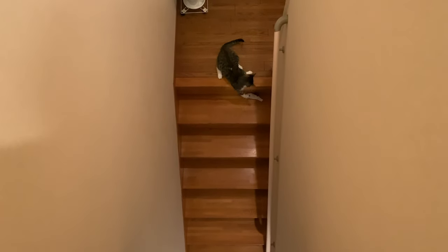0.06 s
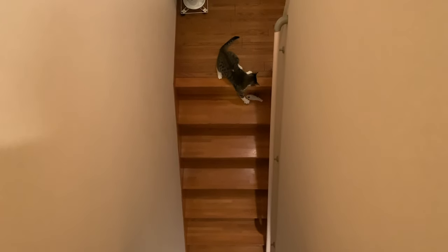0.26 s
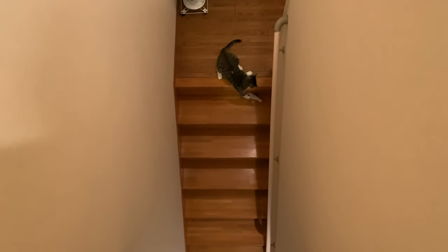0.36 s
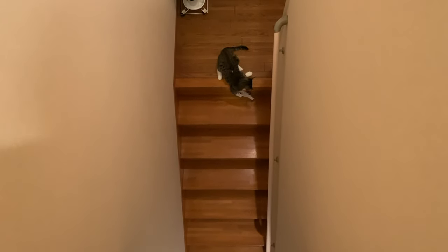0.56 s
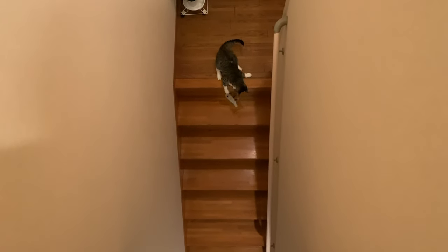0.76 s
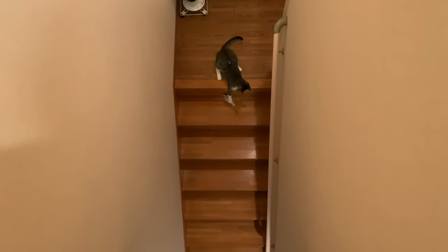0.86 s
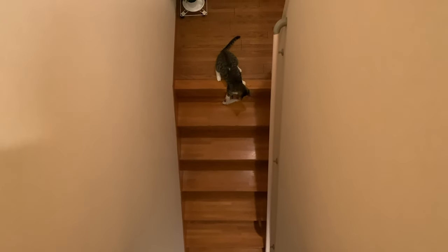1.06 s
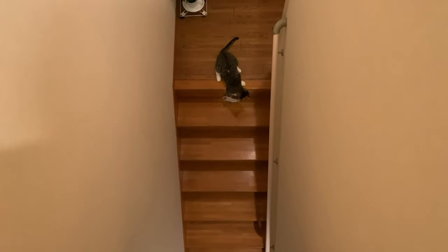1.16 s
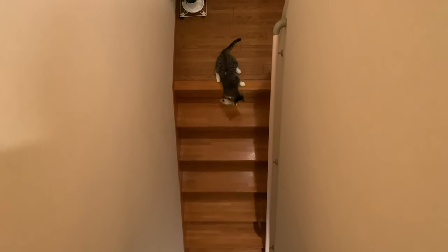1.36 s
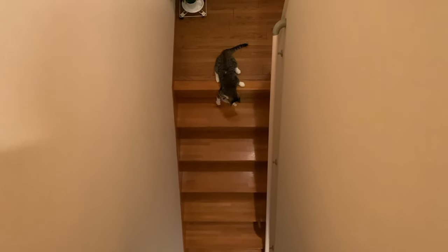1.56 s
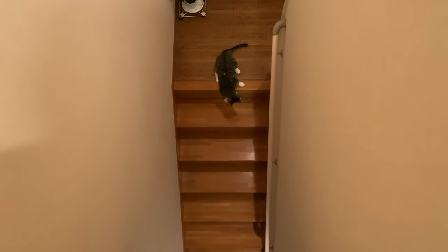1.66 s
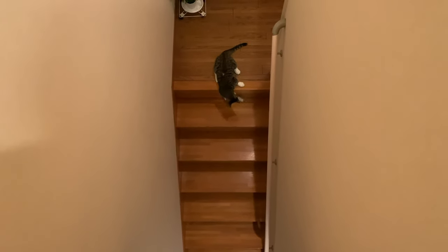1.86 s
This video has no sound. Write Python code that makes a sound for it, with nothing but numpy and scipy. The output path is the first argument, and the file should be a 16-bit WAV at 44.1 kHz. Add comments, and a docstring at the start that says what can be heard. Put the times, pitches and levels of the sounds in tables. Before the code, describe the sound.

Irregular toy knocks on wooden treads, the first by far the loudest, later ones duller with faint thuds; close walls give a short echoing tail, over quiet room noise and low hum, microphone some distance above.

```python
"""At the edge of a wooden staircase, heard from above, a cat bats a small hard toy about.
Each knock is a noise-burst clatter, thickened by close walls, with decaying modes and a stairwell tail.
Faint swells of grainy noise rise around some onsets; ragged rings and falling thuds sound in the treads.
Underneath lie shaped room noise, a faint wavering hum and a band of noise that dies away."""
import sys
import numpy as np
from scipy import signal
from scipy.fft import rfft, irfft
from scipy.io import wavfile
from scipy.ndimage import uniform_filter1d

SR = 44100
rng = np.random.default_rng(int(sys.argv[2]) if len(sys.argv) > 2 else 0)


def digitize_waveform(pressure):
    """Quantize a signal to 16-bit integers and store it at the path in sys.argv[1].

    Rows of a 2-D input are taken as channels; values are limited to [-1, 1].
    """
    field = np.atleast_2d(pressure).T
    bounded = np.clip(field, -1, 1)
    quanta = np.round(bounded * 32767).astype(np.int16)
    wavfile.write(sys.argv[1], SR, quanta)


N = 83790  # scene length [samples]


def amp(db):
    """Level to gain: 20 dB is a factor of ten in amplitude."""
    return 10 ** (np.asarray(db) / 20)


def evened(x):
    """RMS normalisation: scales to mean power 1."""
    return x / np.sqrt(np.mean(x ** 2) + 1e-20)


def unit(x):
    """Energy normalisation: scales to a mean energy of 1 per channel."""
    return evened(x) / np.sqrt(x.shape[-1])


def read(points, hz):
    """Logarithmic frequency scale: interpolates a table along it."""
    f, value = np.transpose(points)
    return np.interp(np.log(hz + 1), np.log(f + 1), value)


def add(mix, s, sound):
    """Superposition: adds a sound to the stereo mix at time s [s]."""
    part = mix[:, round(s * SR):][:, :sound.shape[1]]
    part += sound[:, :part.shape[1]]


def noise_pair(same, size):
    """Partial coherence: mid and side noise give two ports the likeness in the table."""
    a, b = rfft(rng.standard_normal((2, size)))
    likeness = np.clip(read(same, np.fft.rfftfreq(size, 1 / SR)), 0, 1)
    mid = a * np.sqrt((1 + likeness) / 2)
    side = b * np.sqrt((1 - likeness) / 2)
    return irfft([mid + side, mid - side], size)


def colour(x, db):
    """Minimum phase: the Hilbert transform of log gain makes a causal filter from a level per bin."""
    log_gain = np.log(amp(np.concatenate([db, db[-2:0:-1]])))
    response = np.exp(np.conj(signal.hilbert(log_gain)))[:len(db)]
    return irfft(rfft(x) * response)


# bands whose levels depend on how the toy lands: bass, low mids, clack, treble, top
# (low edge [Hz], high edge [Hz])
KNOCK_BANDS = [(220, 500), (500, 1100), (1100, 3000), (4000, 9000), (10500, 14000)]
# broad spectral colour of the knocks, with a narrow dip near 10 kHz
# (frequency [Hz], relative level [dB])
KNOCK_COLOUR = [(60, -25), (150, -13.5), (220, -18), (320, -11), (490, -12), (570, -10), (870, -9.5),
                (1140, -3.5), (1300, -0.5), (1550, 1.5), (2100, -3.5), (2450, -3), (2780, -11),
                (3150, -10.5), (3520, -17.5), (3800, -10.5), (5300, -14), (7000, -20), (9000, -19.5),
                (9900, -38), (10700, -19.5), (13600, -31.5), (15000, -59)]
# ringing modes of toy on wood (frequency [Hz], relative level [dB], t60 [s])
RINGING_MODES = [(319.5, -7, 0.2), (1321, -2, .22), (1522, -10.5, 0.56), (1772, -10, 0.2), (2385, 0, 0.2),
                 (2566, -2, 0.27), (2580, -9.5, 0.33), (3750, -10, 0.24), (5549, -7.5, 0.46),
                 (6380, -6, 0.15), (6880, -0.5, 0.16), (7180, -2, 0.33), (7400, -6, .25)]
RISE_S = 0.0017
CLATTER_FALL = 2.1  # exponent of the decay: above 1, it holds and then drops
CLATTER_GRAIN_DB, DIRECT_SAME = 4, 0.84  # rms unevenness; left-right likeness (0-1)
NEAR_DB, NEAR_S = -1.5, 0.014  # near reflections: energy relative to the clatter, decay constant
RIPPLE_DB, RIPPLE_HZ = 4, 39.63  # fine unevenness of each knock's resonances: size, spacing
KNOCK_GAIN_DB = 65.5


def knock(length, ring_db, band_db):
    """Impact excitation: contacts set off near reflections, damped modes and a diffuse tail."""
    t, hz = np.arange(SR) / SR, np.fft.rfftfreq(SR, 1 / SR)
    rise = 1 - np.exp(-t / RISE_S)

    grain = evened(uniform_filter1d(rng.standard_normal(SR), size=30))
    contacts = amp(CLATTER_GRAIN_DB * grain)
    fall = np.exp(-(t / length) ** CLATTER_FALL)
    clatter = unit(noise_pair([(1, DIRECT_SAME)], SR) * contacts * rise * fall)
    near = amp(NEAR_DB) * unit(noise_pair(TAIL_LIKENESS, SR) * rise * np.exp(-t / NEAR_S))

    ring = np.zeros(SR)
    for f, db, t60 in RINGING_MODES:
        mode = np.sin(2 * np.pi * (f * t + rng.random()))
        ring += amp(db) * unit(rise * amp(-60 * t / t60) * mode)

    ripple_steps = np.clip(rng.standard_normal(SR), -2, 2)
    ripple = RIPPLE_DB * np.interp(hz / RIPPLE_HZ, np.arange(SR), ripple_steps)
    reflected = colour(near + stairwell(), ripple)

    body = read(KNOCK_COLOUR, hz)
    touch = []
    for (low, high), db in zip(KNOCK_BANDS, band_db):
        # bins are 1 Hz apart, so the band edges also index them
        body_power_db = 10 * np.log10(np.sum(amp(body[low:high]) ** 2))
        touch.append((np.sqrt(low * high), db - body_power_db))
    return colour(clatter + amp(ring_db) * ring + reflected, body + read(touch, hz) + KNOCK_GAIN_DB)


# knocks of the toy (time [s], clatter length [s], ringing level [dB],
# then relative level [dB] of: bass, low mids, clack, treble, top)
TOY_KNOCKS = [(0.2188, 0.012, -17, -35.5, -30.5, -21, -14.5, -32),
              (0.435, 0.011, -19.5, -48, -48, -44, -54, -63),
              (0.815, 0.067, -31, -44, -45.5, -46, -51.5, -58),
              (0.918, 0.011, -19.5, -38, -47.5, -52.5, -75, -81),
              (1.028, 0.0071, -25, -43, -51.5, -48, -52.5, -68),
              (1.054, 0.015, -24, -42, -51.5, -43, -47.5, -61),
              (1.0657, 0.0093, -22.5, -42, -46.5, -34.5, -21, -34),
              (1.1305, 0.02, -27, -43, -38, -30.5, -42.5, -52),
              (1.509, .008, -26, -55, -58.5, -60.5, -53.5, -67.5),
              (1.521, 0.021, -24.5, -45.5, -53.5, -47.5, -75, -73),
              (1.6032, 0.015, -31, -41, -32, -32, -38, -58),
              (1.752, 0.03, -20.5, -40.5, -43, -33, -46, -62)]


def knocks():
    """Superposition of impacts: every knock of the toy at its own time."""
    out = np.zeros((2, N))
    for s, length, ring_db, *band_db in TOY_KNOCKS:
        add(out, s, knock(length, ring_db, band_db))
    return out


# faint swells of noise before some knocks
# (time [s], length of swell [s], level at end of swell [dB], treble lift [dB])
NOISE_SWELLS = [(0.196, 0.044, -42.5, -1), (0.744, 0.07, -61, 11.5), (1.59, 0.011, -46.5, -6)]
SWELL_GRAIN_DB = -5  # rms unevenness of the noise


def noise_swells():
    """Amplitude envelope: grainy noise in the knocks' colour rises around the onset, then decays."""
    out = np.zeros((2, N))
    t, hz = np.arange(SR) / SR, np.fft.rfftfreq(SR, 1 / SR)
    for s, length, db, lift_db in NOISE_SWELLS:
        unevenness = evened(uniform_filter1d(rng.standard_normal(SR), size=90))
        grain = evened(amp(SWELL_GRAIN_DB * unevenness))
        tilt = read([(2500, 0.0033), (6000, lift_db)], hz)
        noise = evened(colour(noise_pair(TAIL_LIKENESS, SR) * grain, read(KNOCK_COLOUR, hz) + tilt))
        swell = np.sqrt(t / length) * np.exp(-np.maximum(t - length, 0) / NEAR_S)
        add(out, s, amp(db) * noise * swell)
    return out


THUMP_WIDTH = 0.27  # half-width of the ragged band in natural log of frequency, to 1/e


def ragged(pitch):
    """Narrow-band noise: one second of random vibration around a pitch [Hz]."""
    hz = np.fft.rfftfreq(SR, 1 / SR)
    band = np.exp(-(np.log((hz + 1) / pitch) / THUMP_WIDTH) ** 2)
    return evened(irfft(rfft(rng.standard_normal(SR)) * band))


# rings left in the wood, at a pitch that depends on the spot struck
# (time [s], pitch [Hz], level before rise and decay [dB], t60 [s])
WOOD_RINGS = [(0.222, 325, -18.5, 0.059), (0.222, 613, -21, 0.053), (0.461, 77.3, -40.5, 0.14),
              (0.459, 188, -46, 0.51), (0.974, 368, -47, 0.3), (1.042, 163, -33.5, 0.195),
              (1.072, 1889, -26.5, 0.078), (1.134, 796.6, -40.5, 0.28), (1.285, 196, -50, 0.28),
              (1.526, 338, -51, 0.16), (1.605, 625, -28.5, 0.035), (1.605, 962, -36.5, 0.19),
              (1.613, 410.4, -40, 0.25), (1.796, 187, -44, 0.13)]
THUMP_RISE_S, THUMP_NOISE = 0.0033, 0.49  # rise constant; raggedness added to the sine


def thumps():
    """Damped resonance: a struck tread rings at a slightly ragged pitch."""
    out, t = np.zeros((2, N)), np.arange(SR) / SR
    for s, pitch, db, t60 in WOOD_RINGS:
        ring = np.sin(2 * np.pi * pitch * t) + THUMP_NOISE * ragged(pitch)
        envelope = (1 - np.exp(-t / THUMP_RISE_S)) * amp(db - 60 * t / t60)
        add(out, s, (ring * envelope)[None])
    return out


# short dead thuds of paw and toy
# (time [s], length [s], first pitch [Hz], last pitch [Hz], nominal peak level [dB])
TREAD_THUDS = [(0.2211, 0.0063, 1384, 1336, -13), (0.435, 0.037, 338, 252, -34.5),
               (0.437, 0.062, 200.8, 186.4, -38.5), (0.777, 0.044, 606, 401, -51),
               (0.781, 0.034, 376, 215.7, -47), (0.899, 0.042, 597, 447, -43),
               (0.903, 0.011, 298, 273, -40), (0.923, 0.018, 357.5, 183.8, -37.5),
               (0.935, 0.018, 463, 356.4, -39.5), (1.017, 0.028, 169.3, 155.6, -33),
               (1.128, 0.014, 1556, 1338, -29), (1.533, 0.05, 120.6, 97, -47.5),
               (1.756, 0.0433, 573, 384, -45.5), (1.762, 0.046, 249.8, 151, -38.5)]
THUD_ROUGH = 0.41  # unevenness of the contact
THUD_SKEW = 0.53  # under 1: a thud swells faster than it fades


def thuds():
    """Bending-wave dispersion: a flexing tread's treble arrives first, so each thud falls in pitch."""
    out, t = np.zeros((2, N)), np.arange(SR) / SR
    for s, length, first_hz, last_hz, db in TREAD_THUDS:
        u = t[t < length] / length
        pitch = first_hz * (last_hz / first_hz) ** u
        glide = np.sin(2 * np.pi * np.cumsum(pitch) / SR)
        push = evened(glide + THUD_ROUGH * ragged(pitch.mean())[:len(u)]) / np.sqrt(2)
        add(out, s, (amp(db) * np.sin(np.pi * u ** THUD_SKEW) * push)[None])
    return out


THUMP_ROOM_DB = -7  # gain of the stairwell behind the blows


def treads():
    """Room response by convolution: rings and thuds with the stairwell behind them."""
    blows = thumps() + thuds()
    return blows + amp(THUMP_ROOM_DB) * signal.fftconvolve(blows, stairwell(), axes=1)[:, :N]


# stairwell decay (frequency [Hz], t60 [s])
STAIRWELL_DECAY = [(100, 0.5), (280, 0.91), (600, 0.6257), (1600, 0.5763), (3800, 0.5085), (6500, 0.5),
                   (9000, 0.43), (13000, 0.26)]
# strength of the stairwell tail (frequency [Hz], relative level [dB])
TAIL_LEVEL = [(100, -4), (300, -4.5), (700, 2.5), (1500, -1), (2400, 6), (4000, -1.5), (7000, -5.5),
              (13000, -4)]
# left-right likeness of diffuse sound (frequency [Hz], coherence [0-1])
TAIL_LIKENESS = [(100, 0.93), (300, 0.7), (700, 0.2), (1500, 0.5), (3000, 0.03), (7000, 0.95),
                 (13000, 0.21)]
TAIL_RISE_S = 0.011


def stairwell():
    """Diffuse reverberation: one second of noise decaying by frequency, the top treble soonest."""
    hz, t, z = signal.stft(noise_pair(TAIL_LIKENESS, SR), SR, nperseg=256)
    decay_db = -60 * t / read(STAIRWELL_DECAY, hz)[:, None]
    level_db = read(TAIL_LEVEL, hz)[:, None] + decay_db
    tail = signal.istft(z * amp(level_db), SR, nperseg=256)[1][:, :SR]
    rise = 1 - np.exp(-np.arange(SR) / SR / TAIL_RISE_S)
    return tail * rise / np.sqrt(0.032 * SR)


FADING_HZ, FADING_WIDTH_HZ = 2060, 480  # centre, half-width to 1/e
FADING_DB, FADING_T60 = -60.5, 0.8  # starting level, t60 [s]


def fading_ring():
    """Free decay: a band of sound still hanging in the stairwell at the start dies away."""
    t, hz = np.arange(N) / SR, np.fft.rfftfreq(N, 1 / SR)
    band = np.exp(-((hz - FADING_HZ) / FADING_WIDTH_HZ) ** 2)
    ring = evened(irfft(rfft(noise_pair(TAIL_LIKENESS, N)) * band, N))
    return ring * amp(FADING_DB - 60 * t / FADING_T60)


# level of the hum before its waver (time [s], level [dB])
HUM_COURSE = [(0, -64.5), (.18, -81), (.45, -59.5), (1.9, -59.5)]
HUM_HZ, HUM_WAVER = 100.7, 0.37  # pitch; rms depth of the waver


def hum():
    """Amplitude modulation: slow noise makes a steady low tone waver."""
    t, hz = np.arange(N) / SR, np.fft.rfftfreq(N, 1 / SR)
    waver = evened(irfft(rfft(rng.standard_normal(N)) * np.exp(-hz / 6), N))
    tone = np.sqrt(2) * np.sin(2 * np.pi * HUM_HZ * t) * (1 + HUM_WAVER * waver)
    return amp(np.interp(t, *np.transpose(HUM_COURSE))) * tone


# spectrum of the room noise (frequency [Hz], relative level per Hz [dB])
ROOM_SPECTRUM = [(20, -18), (70, 9), (110, -1), (170, -2.5), (300, -15), (800, -17.5), (1200, -11.5),
                 (2000, -16.5), (3000, -28.5), (8500, -29), (10000, -42), (11500, -24), (13800, -34.5),
                 (15500, -53)]
FLOOR_DB = -61  # rms level


def room_noise():
    """Spectral shaping: filtered white noise gives a dull, steady background."""
    hz = np.fft.rfftfreq(N, 1 / SR)
    shaped = irfft(rfft(noise_pair(TAIL_LIKENESS, N)) * amp(read(ROOM_SPECTRUM, hz)), N)
    return amp(FLOOR_DB) * evened(shaped)


def scene():
    """Linear superposition: knocks, swells, treads and background sum."""
    return knocks() + noise_swells() + treads() + fading_ring() + hum() + room_noise()


# phase lag of the right port behind the left (frequency [Hz], lag [rad])
RIGHT_PORT_LAG = [(0, 0.33), (1600, 0.32), (2500, 0.51), (3400, 2.56), (5000, 3.49), (8400, 8.54),
                  (14000, 10.6)]
EDGE_HZ = 15200  # upper band limit


def record(dry):
    """Phase difference between ports: the right one lags by frequency; a low-pass limits the band."""
    lag = np.interp(np.fft.rfftfreq(2 * N, 1 / SR), *np.transpose(RIGHT_PORT_LAG))
    right = irfft(rfft(dry[1], 2 * N) * np.exp(-1j * lag))[:N]
    low_pass = signal.firwin(255, EDGE_HZ, window=("kaiser", 9), fs=SR)
    return signal.oaconvolve(np.array([dry[0], right]), low_pass[None], "same")


dry = scene()
out = record(dry)
digitize_waveform(out)
```